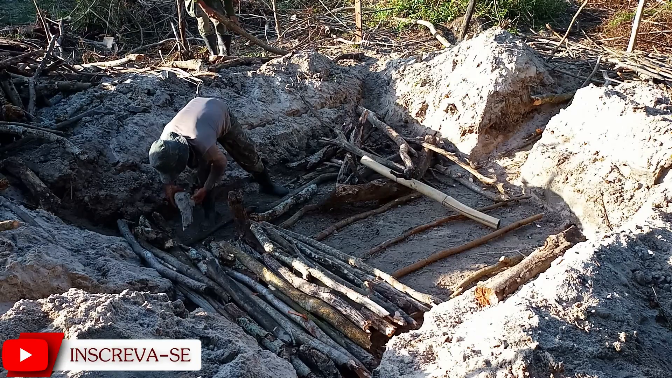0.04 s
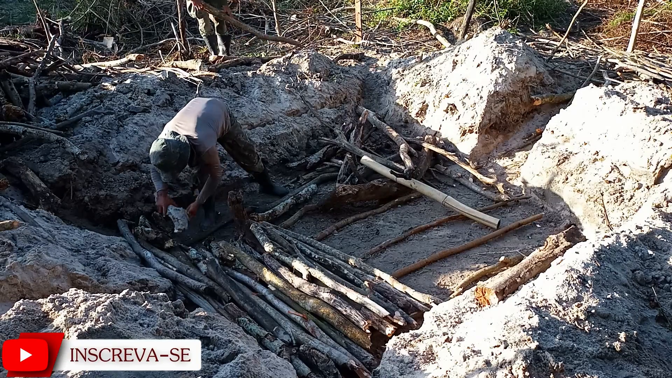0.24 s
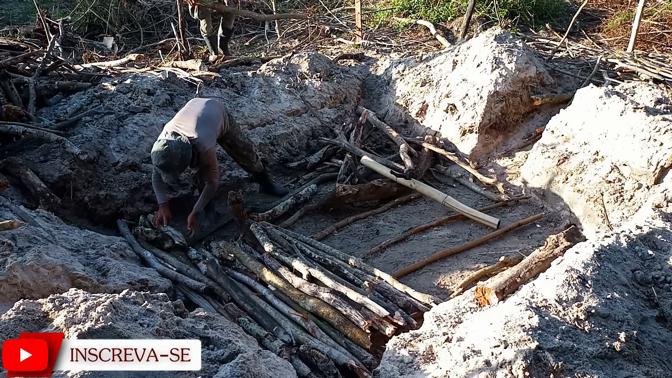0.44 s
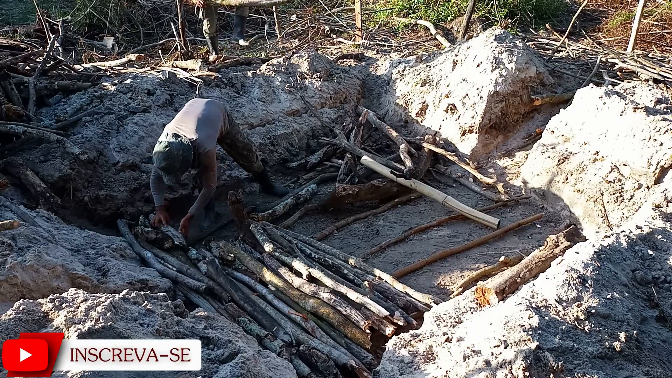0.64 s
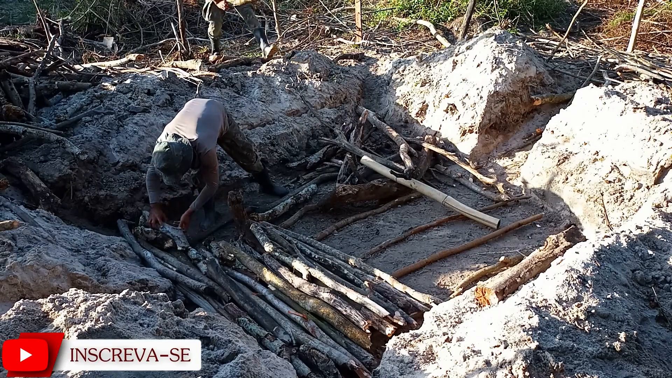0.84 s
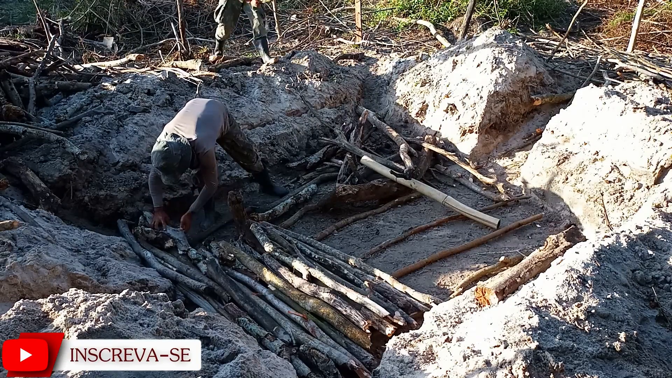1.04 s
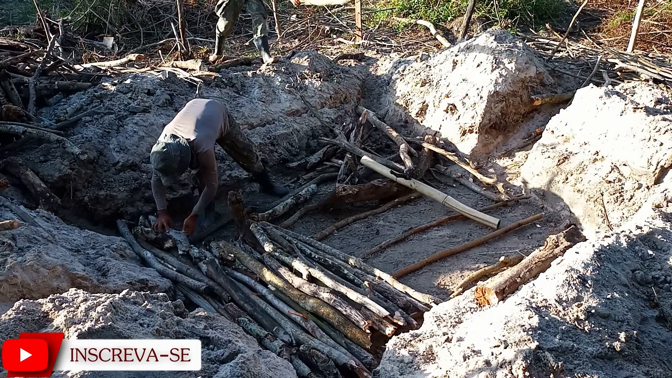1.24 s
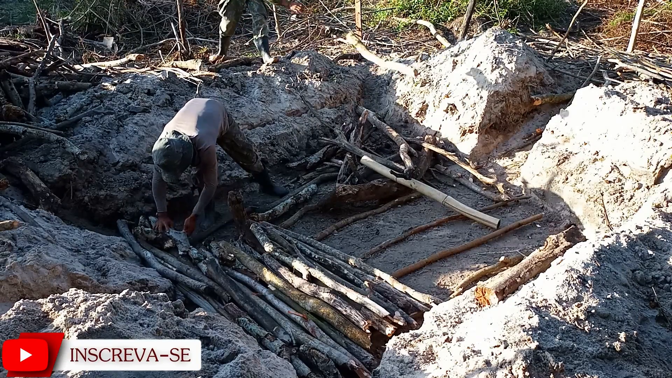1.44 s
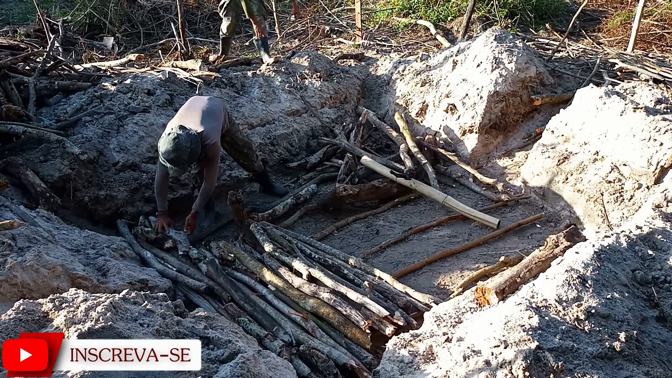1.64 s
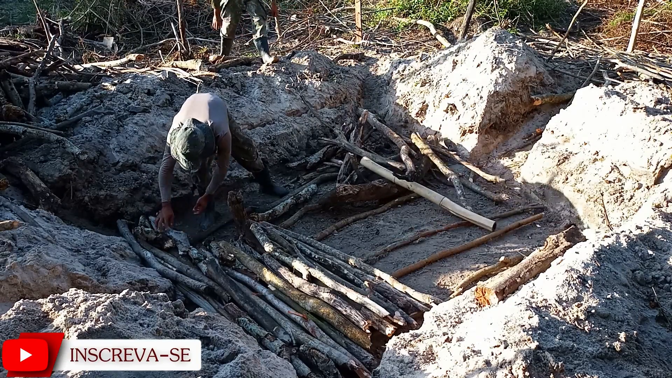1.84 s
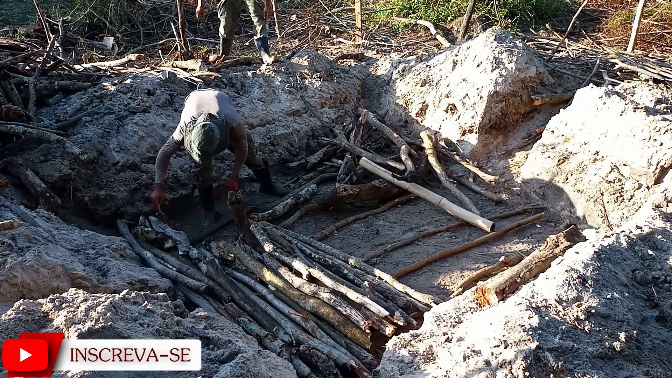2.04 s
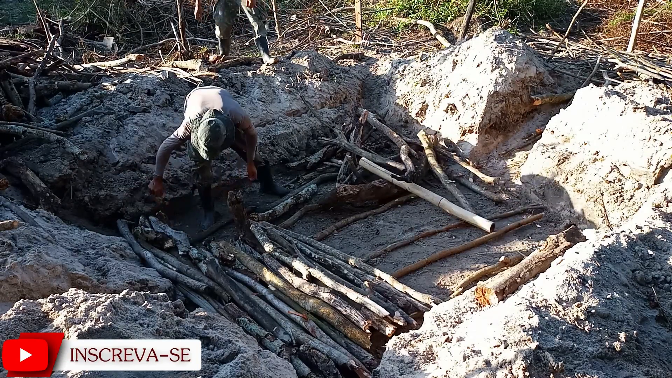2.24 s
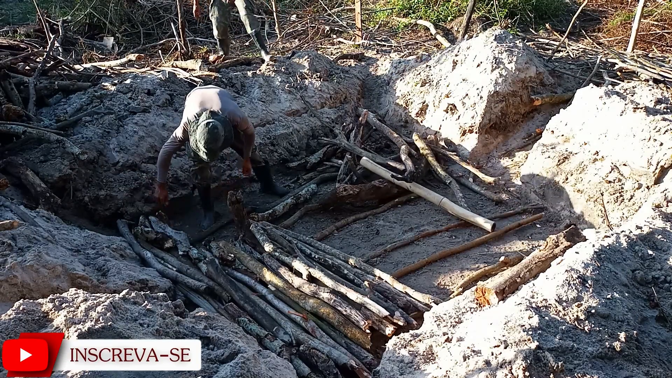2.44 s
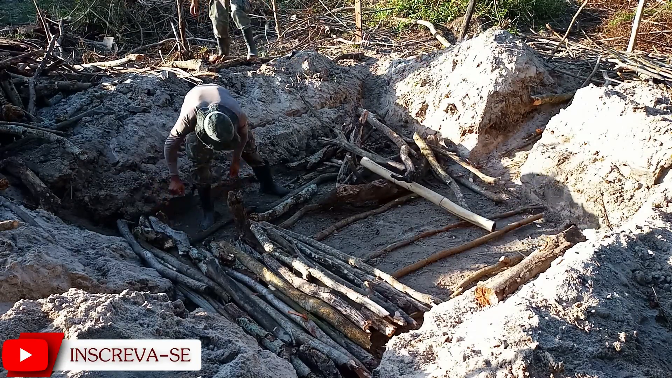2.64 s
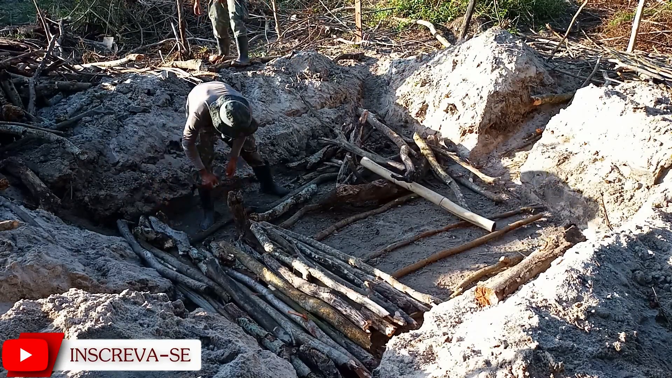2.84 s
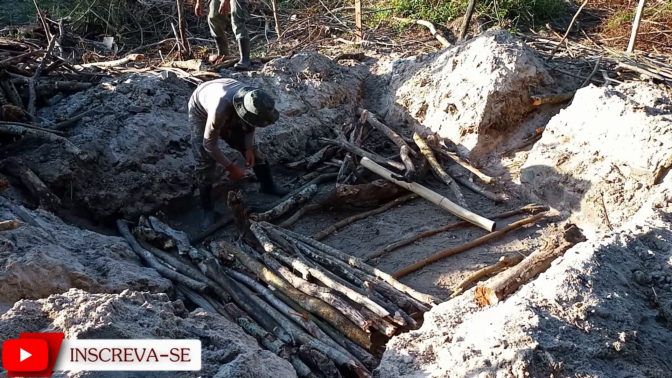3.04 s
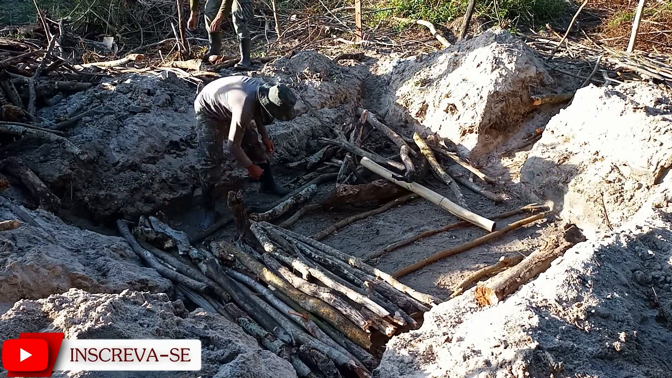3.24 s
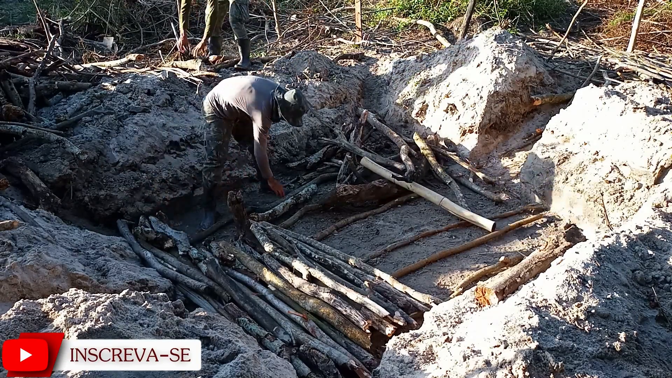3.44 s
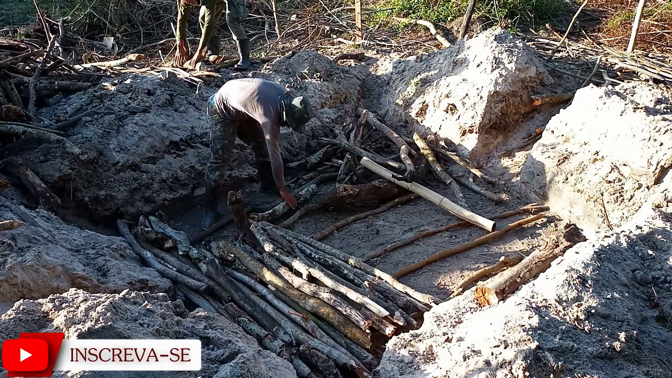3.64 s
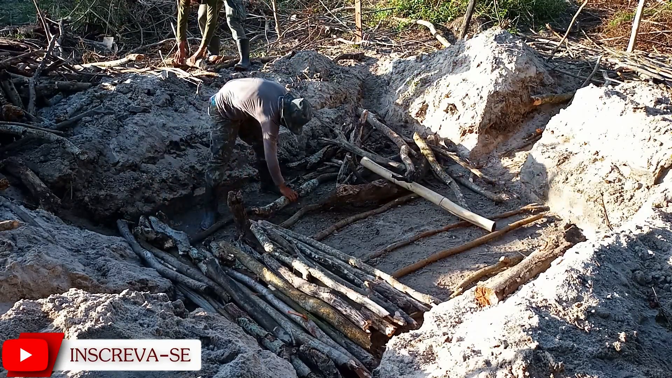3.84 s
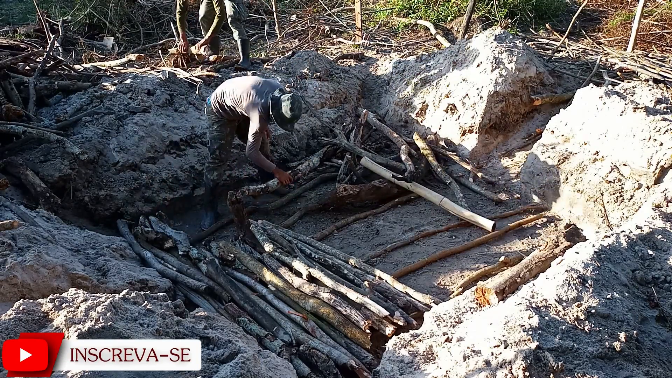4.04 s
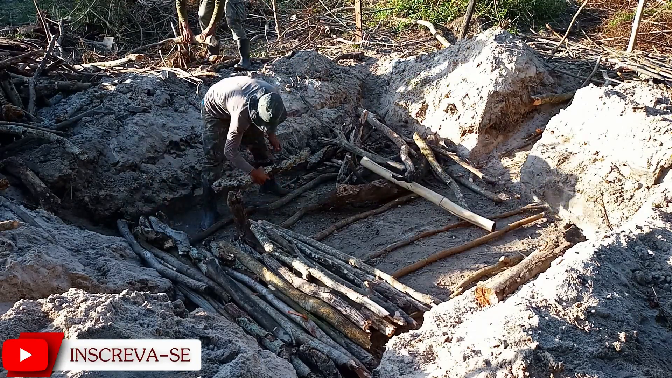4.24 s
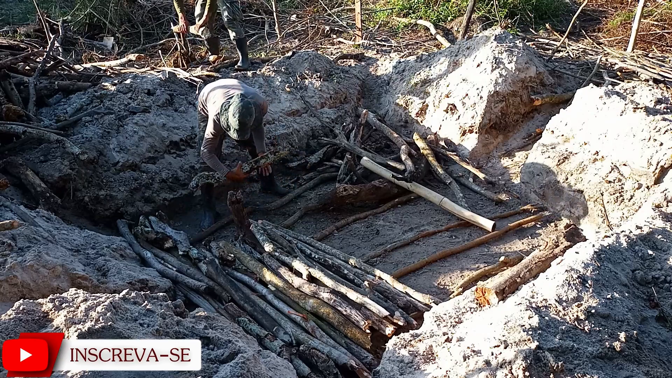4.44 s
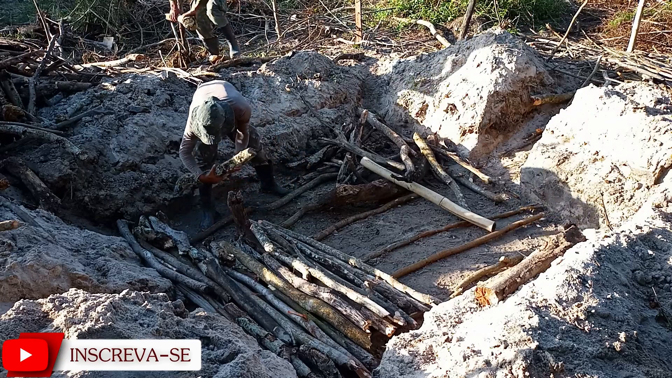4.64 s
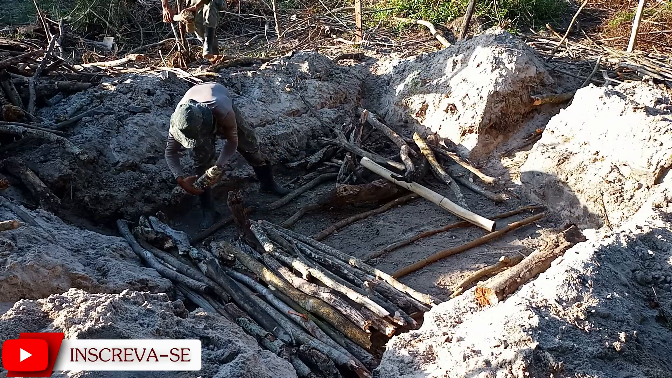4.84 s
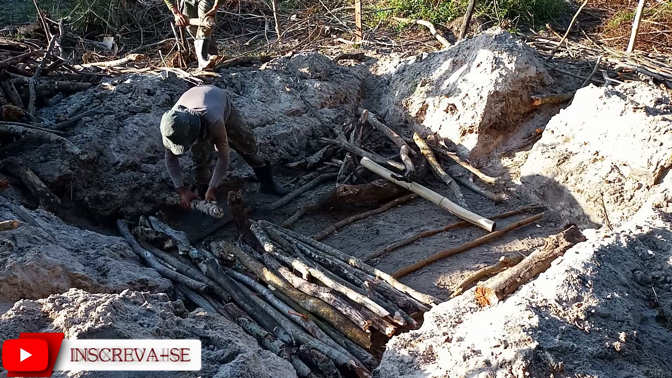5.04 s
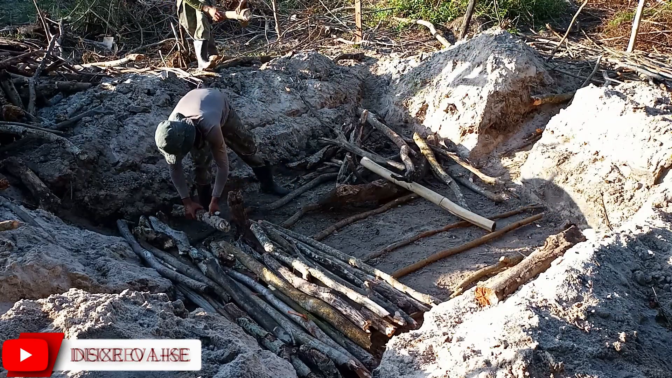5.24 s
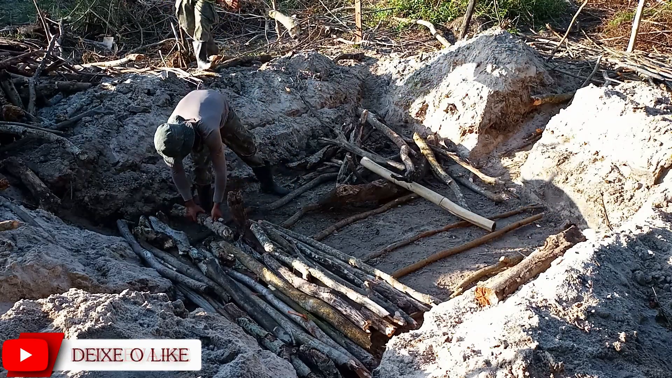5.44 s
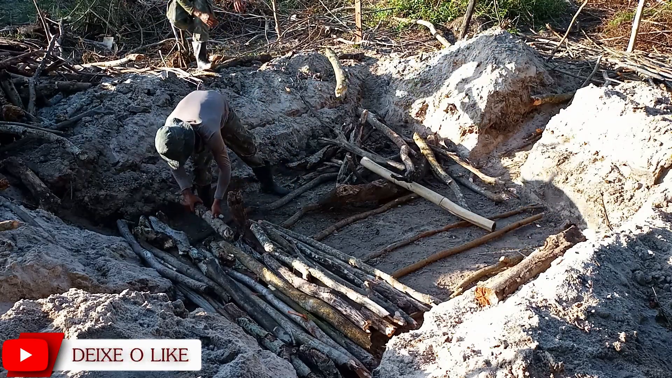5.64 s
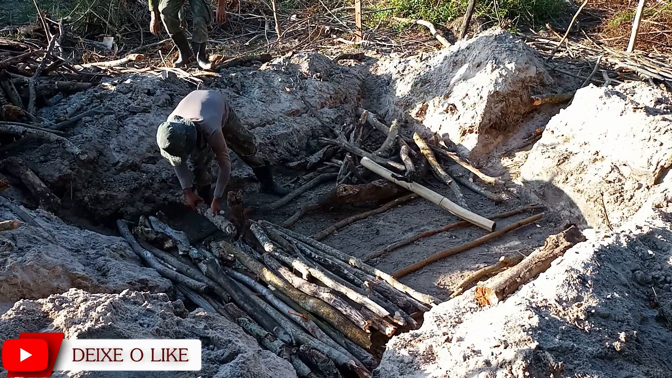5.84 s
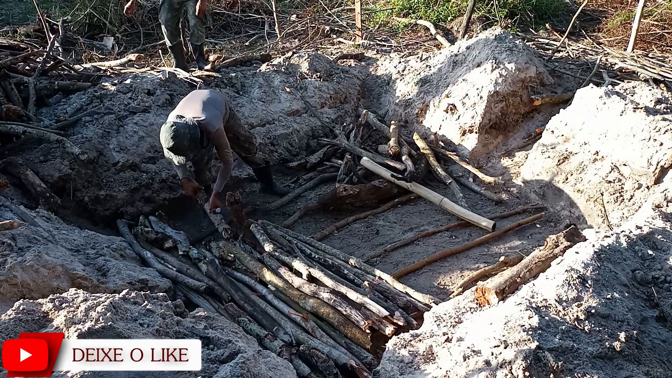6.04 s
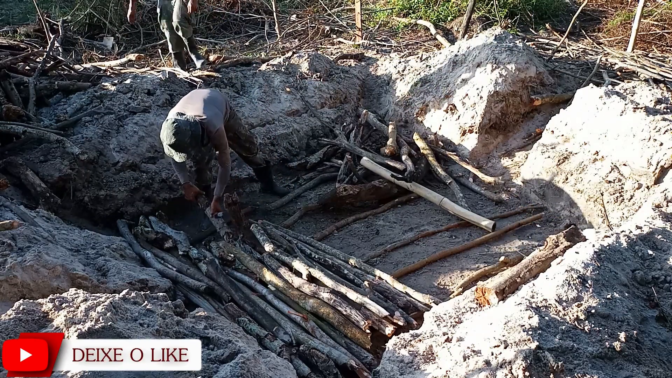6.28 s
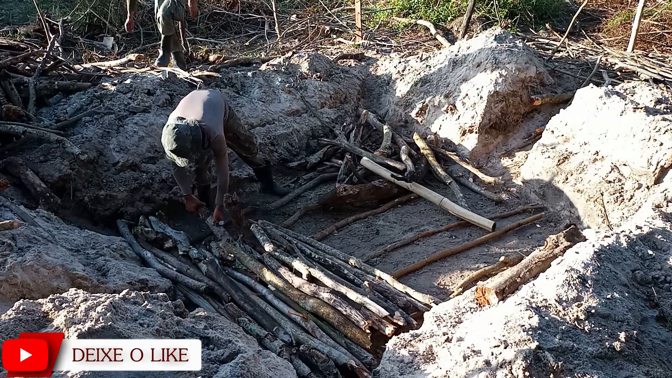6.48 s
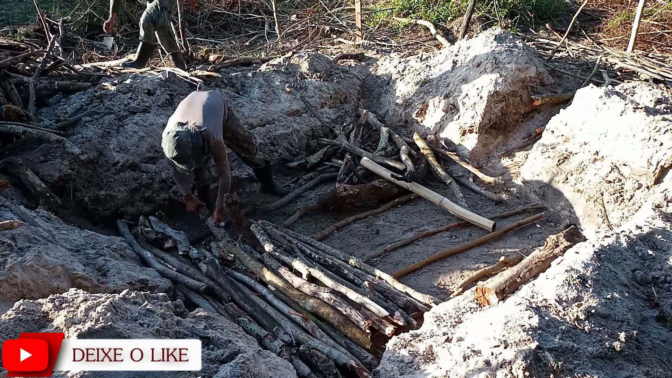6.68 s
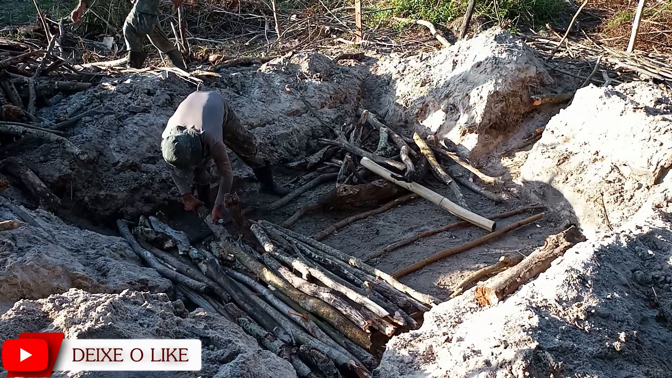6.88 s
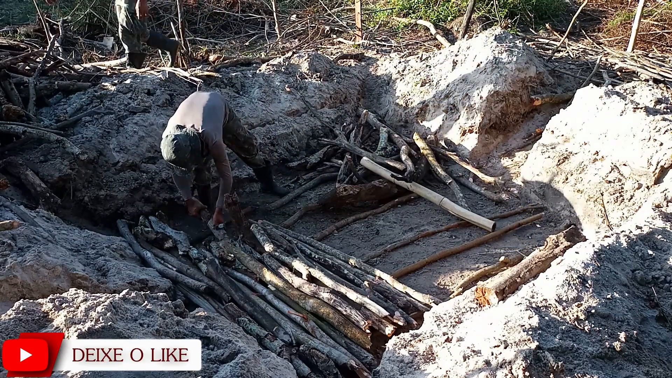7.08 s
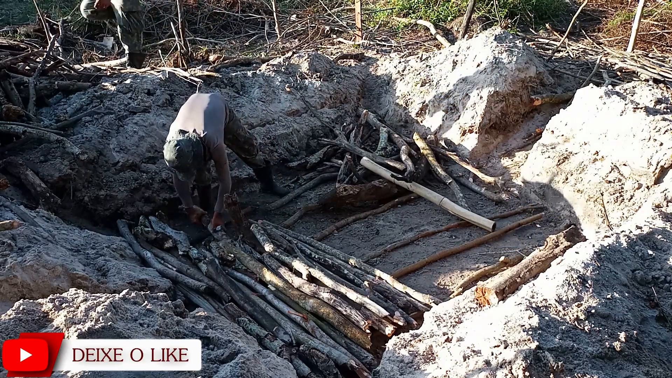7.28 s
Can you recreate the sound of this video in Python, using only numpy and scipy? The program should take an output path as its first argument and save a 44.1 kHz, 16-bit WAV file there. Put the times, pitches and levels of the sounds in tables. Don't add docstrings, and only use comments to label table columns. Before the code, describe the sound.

Dry firewood is stacked by hand. A short knock and light ticks lead to a loud double-ended log landing just before two seconds, woody and ringing. Mostly bark scuffs, leaf crackle and short thin bird whistles fill the middle, with one crisp tick. Near six seconds a shorter log cracks and thuds, bouncing briefly, then splintery clicks trail off. Soft wind, far insects, mono microphone at a few metres.

```python
import sys
import numpy as np
from scipy import signal
from scipy.fft import rfft, irfft, next_fast_len
from scipy.io import wavfile
from scipy.ndimage import uniform_filter1d

SR = 44100
rng = np.random.default_rng(int(sys.argv[2]) if len(sys.argv) > 2 else 0)


def to_linear_factor(level_db):
    exponent = np.asarray(level_db, float) / 20
    return 10 ** exponent


def store_pcm(level_fs):
    pcm = np.round(np.clip(level_fs, -1, 1) * 32767).astype(np.int16)
    wavfile.write(sys.argv[1], SR, np.atleast_2d(pcm).T)


N = 322371

# ratio to its strong mode, level/dB
LOG_MODES = [(0.682, -9.5), (0.998, 0), (1.398, -8), (1.95, -9), (2.6, -16)]
# t/s, peak level/dB, strong mode f/Hz, thump under 300 Hz level/dB
LOG_BLOWS = [(0.493, -30.5, 798, -12), (0.497, -29, 1035, -13.5), (0.983, -42.5, 793, -35),
             (1.004, -38, 668, -11), (1.198, -43, 1290, -27), (1.343, -37, 569, -25),
             (1.361, -38.5, 900, -6.5), (1.508, -50.5, 562, -27), (1.75, -24.5, 798, -23),
             (1.7802, -17, 683, -20), (1.7836, -18, 585, -20), (1.804, -23.5, 370, -30),
             (1.8232, -18, 593, -12), (1.8371, -24.5, 696, -20), (1.864, -33, 374, 0),
             (1.889, -32, 345, -24), (1.931, -43.5, 450, 7.5), (2.045, -44, 603, -3), (2.1, -37, 727, -34),
             (5.952, -21, 992, -6), (5.973, -20.5, 603, -27), (5.947, -27, 794, -20),
             (6.009, -27.5, 622, -33), (6.0135, -26.5, 455, -28), (6.036, -42, 554, -15),
             (6.086, -44, 540, -9), (6.256, -46, 637, -23), (6.664, -44.5, 808, -12),
             (7.082, -45, 580, -6.5)]
# t/s, peak level/dB, strong mode f/Hz, t60/s
DULL_BLOWS = [
    (0.5003, -24.5, 738, 0.032),
    (1.358, -23.5, 850, 0.01),
    (2.034, -29.5, 1234, 0.037),
    (3.787, -39, 1560, 0.018),
    (5.462, -46.5, 490, 0.064),
    (6.002, -17, 484, 0.053),
    (6.706, -52, 240, 0.28),
]
# f/Hz, t60/s, first end level/dB, second end level/dB
LONG_LOG_MODES = [(240.4, 0.13, -13, -7), (299, .12, -8.5, -6), (392, 0.055, -3, -22),
                  (455, 0.077, -13, -2.5), (576, .09, -7, 4), (622, 0.086, -2, -14), (692, 0.055, 3, -0.5),
                  (915, 0.091, -5, -10), (1150, 0.039, -14, -22), (1380, 0.1, -12, -16)]
# t/s, level/dB
FIRST_END_BLOWS = [
    (1.78, -16.5),
    (1.7832, -20.5),
]
# t/s, level/dB
SECOND_END_BLOWS = [
    (1.8225, -19),
    (1.8255, -21.5),
    (1.8333, -25),
    (1.8373, -24),
]
# f/Hz, t60/s, level/dB
SHORT_LOG_MODES = [(314, 0.058, -14.5), (443, 0.057, -1), (573, 0.047, -0.5), (638, 0.053, -4.5),
                   (745, 0.025, -12), (900, .04, -15), (1050, .03, -18)]
# t/s, level/dB
SHORT_LOG_BLOWS = [
    (6.0016, -16.5),
    (6.0095, -26),
    (6.0146, -21),
    (6.037, -33),
    (6.057, -40),
]
# f/Hz, t60/s, level/dB
BUTT_LOG_MODES = [(398, .08, -3.5), (496, 0.088, 1.5), (585, 0.054, -2)]
# t/s, level/dB
BUTT_LOG_BLOWS = [
    (5.4615, -38),
]
# t/s, peak level/dB, ring f/Hz, treble above 4 kHz level/dB, t60/s
STICK_CRACKS = [(0.4895, -31, 2660, -29.5, 0.067), (0.4995, -18.5, 3880, -43, 0.023),
                (1.2002, -41.5, 1560, -56, 0.051), (1.3523, -28, 1520, -58, 0.034),
                (1.751, -15.5, 5200, -25, 0.014), (1.7517, -11, 2520, -24, 0.036),
                (1.7805, -17.5, 1540, -33, 0.038), (1.784, -16.5, 3680, -21, 0.056),
                (1.8048, -18.5, 4200, -39, 0.13), (1.8257, -17, 2800, -39, 0.073),
                (1.8394, -24.5, 1350, -22.5, 0.1), (1.8644, -24.5, 3400, -41, 0.018),
                (1.8826, -20, 2030, -40, 0.028), (1.8984, -28, 5200, -27, 0.024),
                (2.0353, -34.5, 2470, -54, 0.043), (2.0945, -24.5, 3000, -38, 0.046),
                (3.787, -20.5, 4340, -9, 0.0053), (5.9474, -22.5, 3240, -41, 0.089),
                (5.9554, -10.5, 3540, -47, 0.04), (5.9694, -17.5, 5000, -40, .026),
                (5.9754, -20.5, 1730, -20, 0.027), (5.9998, -21, 1570, -51, 0.041),
                (6.1414, -23, 3080, -37, 0.027), (6.2574, -34.5, 4150, -32, 0.052)]
# t/s, peak level/dB, treble above 4 kHz level/dB, t60/s
BARK_SCUFFS = [(0.3994, -62, -53, 0.13), (0.595, -46, -77, 0.066), (0.6478, -48, -60, 0.05),
               (0.656, -43.5, -42, 0.18), (0.9377, -44, -57, 0.017), (0.9524, -43.5, -63, 0.084),
               (0.9838, -45.5, -50, 0.078), (1.0035, -38, -62, 0.073), (1.169, -47.5, -70, 0.13),
               (1.3239, -38.5, -60, 0.13), (1.933, -29, -54, 0.089), (2.3003, -40.5, -55, 0.032),
               (2.5396, -47, -40, .02), (3.34, -53, -47.5, 0.17), (3.4516, -53.5, -71, 0.13),
               (3.484, -60, -47, .042), (3.7884, -37, -28.5, 0.12), (4.6244, -58, -51, 0.076),
               (4.7, -70, -51, 0.063), (5.0776, -49, -43, 0.17), (5.739, -47.5, -50, 0.072),
               (6.0861, -42, -56, 0.08), (6.3284, -47.5, -45, 0.081), (6.506, -56, -41, 0.08),
               (6.5308, -49, -39, 0.12), (6.54, -39.5, -38, 0.1), (6.64, -40.5, -66, 0.15),
               (6.9526, -46, -66, 0.12), (7.123, -38, -54, 0.063), (7.253, -41.5, -63, 0.13)]
# f/Hz, level/dB, t60/s
TWIG_MODES = [(1070, -7, 0.16), (1930, 0, 0.06), (2950, -5, 0.036), (3930, -27, 0.044), (4700, -7, 0.038),
              (6500, -4, 0.037)]
# t/s, level/dB
TWIG_TAPS = [
    (2.0941, -32),
    (2.098, -28.5),
    (2.111, -46),
]
# t/s, peak level/dB, ring f/Hz, t60/s
RING_TICKS = [(0.609, -50, 3300, .015), (0.985, -44, 1500, .02), (1.753, -17.5, 5670, 0.01),
              (3.7872, -24.5, 8530, 0.012), (0.9372, -47, 4370, .015), (0.9375, -48, 3050, .015),
              (0.953, -46, 3800, .018), (1.187, -46, 5100, .012), (1.199, -35, 1320, 0.014),
              (1.201, -48, 2700, .012), (1.7842, -20, 5800, 0.009), (1.8085, -25, 3900, .015),
              (1.8265, -36, 2770, 0.011), (1.8385, -24, 4550, .012), (1.8655, -27, 4700, .012),
              (1.886, -32, 2300, 0.013), (2.539, -48, 3530, 0.013), (3.296, -60, 3600, .01),
              (5.9575, -28, 3850, .015), (5.976, -22, 2300, 0.012), (6.506, -49, 3000, .015),
              (7.082, -56, 1220, 0.014), (0.4992, -25.5, 1110, 0.032), (1.7526, -18.5, 1864, 0.034),
              (1.7804, -18, 1193, 0.045), (1.8245, -21.5, 920, 0.056), (1.8385, -25, 1333, 0.032),
              (2.0955, -33, 1955, 0.04), (2.3004, -45, 5070, .008), (2.3, -57, 10400, .008),
              (5.9551, -33, 2000, 0.027), (6.257, -44, 9000, .008), (6.2577, -42, 13000, .008),
              (6.551, -44, 2200, .012), (6.655, -46, 2740, .02), (6.69, -46, 900, 0.06),
              (1.009, -52, 4350, .015), (1.327, -45, 3160, .025), (6.7, -50, 1150, .06),
              (5.977, -23.5, 920, 0.037), (5.956, -20.5, 1034, 0.025), (6.087, -37.5, 2050, 0.016),
              (1.945, -40.5, 1200, 0.074), (6.142, -37.5, 1800, .02), (6.259, -44, 1130, 0.027),
              (1.888, -39, 420, .05), (1.807, -32, 330, 0.037)]
# t/s, peak level/dB, lower edge f/Hz
BARK_CLICKS = [(0.595, -50, 4000), (0.6074, -47, 4000), (0.9368, -51, 4000), (2.2997, -52, 4000),
               (2.5394, -44, 4000), (4.6224, -49, 4000), (4.7017, -52, 4000), (4.7805, -50, 4000),
               (4.9531, -54, 4000), (5.0789, -39.5, 4000), (5.2844, -57, 4000), (6.1409, -35.5, 4000),
               (6.2575, -36, 4000), (6.3275, -48, 4000), (6.507, -37, 4000), (6.5204, -42, 4000),
               (6.5311, -37, 4000), (6.5374, -46, 4000), (6.544, -39, 4000), (6.552, -30, 4000),
               (6.5894, -49, 4000), (6.6624, -48, 4000), (7.123, -50, 4000)]
# peak t/s, swell/s, level/dB, fineness/dB
SLIDES = [(0.05, 0.079, -76, -1), (0.494, 0.005, -68, -7), (0.62, 0.093, -64.5, 1),
          (0.999, 0.043, -58.5, -3), (1.15, 0.15, -68.5, 0.5), (1.36, 0.13, -70.5, -8),
          (1.92, 0.062, -46, -2), (2.12, 0.035, -59, -7), (2.28, 0.072, -65, -2), (2.48, 0.096, -67, -1.5),
          (3.3, 0.024, -69, 5), (3.39, 0.052, -67, 3), (3.5, 0.24, -78, 4), (3.773, 0.028, -59.5, -4),
          (3.85, 0.11, -71, 0), (4.15, 0.028, -78, -7), (4.55, 0.26, -71.5, -0.5), (4.8, 0.052, -72.5, 8),
          (4.88, 0.051, -71, -1), (5.05, 0.085, -66.5, 6), (5.25, 0.098, -69, -4), (5.6, 0.21, -70, -2.5),
          (6.0, 0.066, -58, -23), (6.14, 0.11, -60.5, 3.5), (6.38, 0.13, -63, -4), (6.62, 0.11, -62, 1.5),
          (7.0, 0.14, -66.5, 0), (7.2, 0.23, -68, -20)]
# peak t/s, swell/s, level/dB
LEAF_DRAGS = [
    (0.05, .08, -71),
    (4.82, .07, -68),
    (4.97, 0.086, -64.5),
    (5.2, .06, -67.5),
]
# t/s, length/s, start f/Hz, end f/Hz, level/dB
BIRD_GLIDES = [(0.836, 0.064, 3540, 2450, -65), (1.041, 0.058, 4010, 3600, -57),
               (1.1, 0.05, 3250, 2780, -65), (1.358, 0.061, 3900, 4095, -51.5),
               (1.403, .03, 3800, 3400, -60), (2.977, 0.06, 3080, 3300, -74),
               (1.465, 0.036, 3350, 2950, -62), (1.534, 0.051, 3250, 2660, -74),
               (1.656, 0.04, 3600, 3450, -54.5), (1.682, .045, 3250, 2750, -60),
               (2.474, 0.021, 3210, 2950, -57), (3.034, 0.048, 5850, 4750, -68),
               (3.094, 0.03, 5150, 4240, -61), (3.192, 0.024, 2800, 2680, -62),
               (3.958, .04, 3580, 3860, -65.5), (4.03, 0.094, 6060, 6480, -60),
               (4.544, 0.065, 3150, 3400, -64.5), (4.6, 0.19, 3400, 3270, -68.5),
               (4.865, 0.031, 2900, 3060, -60), (4.844, 0.031, 4160, 3650, -64),
               (5.184, 0.034, 3980, 3600, -66), (5.216, 0.055, 3140, 2780, -69),
               (5.887, .03, 3500, 4040, -54), (6.231, 0.067, 3650, 2660, -53),
               (6.418, 0.045, 3800, 3000, -65), (6.719, 0.031, 3560, 4000, -60),
               (6.749, 0.046, 4000, 2780, -58), (4.147, 0.026, 6400, 6180, -69)]
# t/s, length/s, f/Hz, level/dB
BIRD_PIPS = [(0.444, 0.05, 4000, -65), (0.513, .08, 3930, -68), (0.811, 0.051, 3430, -68),
             (1.019, .1, 3400, -61), (1.0, .09, 2770, -69), (1.415, 0.13, 4500, -68),
             (1.528, .05, 3980, -70), (1.602, 0.026, 3740, -66), (1.69, 0.065, 3570, -66),
             (2.612, 0.0094, 5800, -64), (2.707, .008, 2760, -70), (2.72, 0.0077, 2710, -60.5),
             (2.81, 0.0094, 2740, -63.5), (2.906, 0.011, 2690, -66), (3.064, 0.021, 4650, -64),
             (3.17, 0.024, 2447, -61), (3.647, 0.086, 3760, -62.5), (3.924, 0.026, 3740, -55.5),
             (4.01, 0.04, 4004, -59), (4.202, 0.3, 3090, -74), (4.364, 0.022, 3514, -59),
             (4.39, 0.16, 3540, -71), (5.087, .03, 3040, -69), (5.43, 0.12, 3710, -68.5),
             (5.582, 0.04, 3440, -64), (5.913, 0.041, 3960, -50.5), (6.452, 0.15, 2975, -62.5)]
# peak t/s, swell/s, level/dB
FLOCK_CALLS = [
    (1.08, 0.065, -63),
    (1.45, 0.051, -63),
    (1.58, .08, -67),
    (1.72, 0.043, -69),
    (4.9, 0.11, -69),
]
# t/s, level/dB
WIND_LEVEL = [(0.0, -59), (0.3, -60.5), (0.63, -57.5), (1.32, -64.5), (1.77, -58.5), (1.97, -60),
              (2.12, -66), (2.58, -63), (2.81, -67.5), (3.7, -61), (4.01, -62.5), (5.03, -57.5),
              (5.44, -63.5), (5.7, -58.5), (6.11, -55), (6.43, -58), (6.98, -59.5), (7.31, -56)]
# f/Hz, level/dB per Hz
WIND_SPECTRUM = [(35, -61), (60, -38), (134, -14.5), (280, -18.5), (410, -2), (504, -3.5), (601, -2.5),
                 (817, -13), (1080, -10), (1370, -30.5), (2000, -43), (2600, -71), (4400, -120)]
# peak t/s, swell/s, level/dB
SETTLING = [
    (1.88, 0.042, -44),
    (2.04, 0.054, -59.5),
    (6.1, 0.047, -56),
]
# peak t/s, swell/s, level/dB
RUMBLES = [
    (0.02, 0.092, -79),
    (2.0, 0.057, -69),
    (3.2, 0.23, -72),
    (3.8, 0.14, -74),
    (6.5, 0.04, -73),
]
# f/Hz, level/dB per Hz
AIR_SPECTRUM = [(400, -3), (600, -4), (1000, -14), (1600, -12.5), (2300, -25), (3600, -17.5), (4600, -19),
                (5800, -28.5), (7000, -26.5), (8500, -33.5), (10500, -31), (12000, -54), (15500, -36)]
# centre f/Hz, width/Hz, level/dB
INSECTS = [(6630, 340, -75), (7310, 540, -78)]


def unit(x):
    return x / np.sqrt(np.mean(x ** 2))


def clock(length):
    return np.arange(length) / SR


def sine(hz, t):
    return np.sin(2 * np.pi * hz * t)


def add(out, s, x):
    i = int(s * SR)
    out[i:i + len(x)] += x[:N - i]


def fade(t, t60, rise_s):
    return (1 - np.exp(-t / rise_s)) * np.exp(-np.log(1000) * t / np.clip(t60, 0.008, 0.4))


def band(x, lo_hz, hi_hz, order=2):
    edges = [lo_hz, min(hi_hz, 0.45 * SR)]
    return signal.sosfilt(signal.butter(order, edges, "band", fs=SR, output="sos"), x)


def coloured(spectrum):
    hz, db = np.transpose(spectrum)
    size = next_fast_len(N)
    log_f = np.log(np.arange(size // 2 + 1) * SR / size + 1)
    gain = to_linear_factor(np.interp(log_f, np.log(hz), db))
    return unit(irfft(rfft(rng.standard_normal(size)) * gain, size)[:N])


def walk(rate):
    hold = int(SR / rate)
    steps = np.repeat(rng.standard_normal(N // hold + 1), hold)[:N]
    return unit(uniform_filter1d(uniform_filter1d(steps, hold), hold))


def patchy(x, lo_hz, octaves, slow_db, quick_db, count=3):
    edges = lo_hz * 2 ** (np.arange(int(count * octaves) + 1) / count)
    slices = (to_linear_factor(slow_db * walk(5) + quick_db * walk(18)) * band(x, lo, hi) for lo, hi in zip(edges, edges[1:]))
    return unit(sum(slices))


def swells(rows, bed_db):
    t, out = clock(N), to_linear_factor(bed_db)
    for s, swell_s, db in rows:
        u = (t - s) / max(swell_s, 0.01)
        out = out + to_linear_factor(db) * np.exp(-np.where(u < 0, u, u / 1.6) ** 2)
    return out


def struck(modes, blows, rise_s):
    out, t = np.zeros(N), clock(SR // 3)
    chance = rng.standard_normal((len(blows), len(modes)))
    for (s, db), scatter in zip(blows, chance):
        ring = sum(to_linear_factor(db + mode_db + 2.1 * c) * sine(hz, t) * fade(t, t60, rise_s)
                   for (hz, t60, mode_db), c in zip(modes, scatter))
        add(out, s, -ring)
    return out


def thrown_logs():
    first_end = [(hz, t60, first_db) for hz, t60, first_db, _ in LONG_LOG_MODES]
    second_end = [(hz, t60, second_db) for hz, t60, _, second_db in LONG_LOG_MODES]
    rings = struck(first_end, FIRST_END_BLOWS, 0.0005) + struck(second_end, SECOND_END_BLOWS, 0.0011)
    rings = rings + struck(SHORT_LOG_MODES, SHORT_LOG_BLOWS, 0.0009)
    rings = rings + struck(BUTT_LOG_MODES, BUTT_LOG_BLOWS, 0.002)
    return band(rings, 190, 16000)


def all_blows():
    blows = []
    for s, db, hz, thump_db in LOG_BLOWS:
        t60 = 0.077 * (600 / hz) ** 0.31
        rattle_db = -8.5 - 0.06 * (db + 13)
        blows.append((s, db, hz, thump_db, t60, rattle_db))
    return blows + [(s, db, hz, -32, t60, -12.5) for s, db, hz, t60 in DULL_BLOWS]


def thuds():
    out, t = np.zeros(N), clock(SR // 3)
    ratio, mode_db = np.transpose(LOG_MODES)
    overtone = mode_db < mode_db.max()
    pile = sine(238, t) + 1.73 * sine(295, t)
    for s, db, hz, thump_db, t60, rattle_db in all_blows():
        detune, scatter = rng.standard_normal((2, len(ratio)))
        mode_hz = hz * ratio * (1 + 0.071 * detune * overtone)
        ring = sum(to_linear_factor(d) * sine(m, t) * fade(t, t60 * (hz / m) ** 1.45, 0.00094)
                   for m, d in zip(mode_hz, mode_db + 2.4 * scatter))
        ring = ring / np.abs(ring).max()
        rattle = unit(band(rng.standard_normal(len(t)), 0.76 * hz, 2.01 * hz)) * fade(t, 1.65 * t60, 0.0013)
        thump = pile * fade(t, 1.35 * t60, 0.0065)
        add(out, s, to_linear_factor(db) * (-ring + to_linear_factor(rattle_db) * rattle + to_linear_factor(thump_db - 5) * thump))
    return band(out, 155, 16000)


def cracks():
    out, t = np.zeros(N), clock(SR // 5)
    scuffs = [(s, db, 3900, top_db, t60) for s, db, top_db, t60 in BARK_SCUFFS]
    for s, db, hz, top_db, t60 in STICK_CRACKS + scuffs:
        noise, chatter = rng.standard_normal((2, len(t)))
        noise = noise * to_linear_factor(2 * unit(uniform_filter1d(chatter, size=50)))
        shape = fade(t, t60, 0.1 * t60 ** 2)
        tail = to_linear_factor(-11.5) * fade(t, 3.17 * t60, 0.015)
        burst = unit(band(noise, 0.5 * hz, 5200))
        ring = unit(band(noise, 0.95 * hz, 1.05 * hz, order=1))
        overtone_hz = np.clip(hz * np.exp(0.33 * rng.standard_normal(4)), 900, 7000)
        overtones = unit(sum(band(noise, 0.96 * m, 1.04 * m, order=1) for m in overtone_hz))
        treble = unit(band(noise, 4120, 7250)) + to_linear_factor(4) * unit(band(noise, 8600, 0.43 * SR))
        modes = (shape + 0.67 * tail) * (0.54 * ring + 0.86 * overtones)
        body = (0.42 * shape + 0.85 * tail) * burst + modes
        add(out, s, to_linear_factor(db - 11) * body + to_linear_factor(top_db - 16.5) * (shape + tail) * treble)
    return out


def twig():
    out, t = np.zeros(N), clock(SR // 5)
    for s, db in TWIG_TAPS:
        for hz, mode_db, t60 in TWIG_MODES:
            level = to_linear_factor(db + mode_db + 2.9 * rng.standard_normal())
            add(out, s, level * sine(hz, t) * fade(t, min(0.62 * t60, 0.07), 0.00037))
    return out


def ticks():
    out, t = np.zeros(N), clock(SR // 20)
    for s, db, hz, t60 in RING_TICKS:
        level_chance, pitch_chance = rng.standard_normal(2)
        overtone = to_linear_factor(-10.5 + 2 * level_chance) * sine(hz * (1.5 + 0.178 * pitch_chance), t)
        add(out, s, to_linear_factor(db) * (sine(hz, t) + overtone) * fade(t, t60, 0.0002))
    return out


def clicks():
    out, t = np.zeros(N), clock(SR // 40)
    for s, db, lo_hz in BARK_CLICKS:
        burst = unit(band(rng.standard_normal(len(t)), lo_hz, 17600))
        add(out, s, to_linear_factor(db - 3) * burst * fade(t, 0.0097, 0.00032))
    return out


def grains(rate, spread_db):
    hits = (rng.random(N) < rate / SR) * to_linear_factor(spread_db * rng.exponential(size=N))
    smear = signal.lfilter([1], [1, -np.exp(-1 / (0.003 * SR))], hits)
    return (unit(smear) + 1.3) * rng.standard_normal(N)


def rustle():
    s, swell_s, db, fine_db = np.transpose(SLIDES)
    shower = grains(400, 2.6)
    crackle = patchy(band(shower, 3000, 5600, order=1), 2700, 4 / 3, 1.2, 1.8, count=6)
    scrape = patchy(shower, 900, 4 / 3, 2, 2)
    dust = to_linear_factor(2.6 * walk(25)) * unit(band(shower, 4000, 21000))
    bed_db = -83.5
    return (swells(zip(s, swell_s, db), bed_db) * crackle
            + swells(zip(s, swell_s, db - 10.5 - 0.78 * fine_db), bed_db - 16) * scrape
            + swells(zip(s, swell_s, db - 8 + fine_db), bed_db - 8.5) * dust)


def leaves():
    return swells(LEAF_DRAGS, -98) * unit(band(grains(900, 2.2), 3500, 7700))


def birds():
    out, wobble = np.zeros(N), walk(200)
    pips = [(s, length, hz, hz, db) for s, length, hz, db in BIRD_PIPS]
    for s, length, start_hz, end_hz, db in BIRD_GLIDES + pips:
        midway = 0.38 if end_hz < start_hz else 0.67
        mid_hz = start_hz + midway * (end_hz - start_hz)
        u = np.linspace(0, 1, int(length * SR))
        hz = start_hz * (1 - u) * (1 - 2 * u) + 4 * mid_hz * u * (1 - u) + end_hz * u * (2 * u - 1)
        waver_rad = 0.75 * wobble[int(s * SR):][:len(u)]
        shape = np.sin(np.pi * u ** 0.49) ** 0.15
        add(out, s, to_linear_factor(db) * shape * np.sin(2 * np.pi * np.cumsum(hz) / SR + waver_rad))
    out = out * to_linear_factor(2.5 * wobble[::-1])
    t = clock(SR // 2)
    trees = rng.standard_normal(len(t)) * fade(t, 0.3, 0.008)
    echoes = signal.fftconvolve(out, trees / np.linalg.norm(trees))[:N]
    return 0.8 * out + 0.8 * echoes * (1 + 0.5 * np.roll(wobble, SR))


def flock():
    lo_hz, hi_hz = 3400, 4200
    return swells(FLOCK_CALLS, -95) * patchy(rng.standard_normal(N), lo_hz, np.log2(hi_hz / lo_hz), 1.8, 4.2, count=14)


def wind():
    s, db = np.transpose(WIND_LEVEL)
    level = to_linear_factor(np.interp(clock(N), s, db) + 1.5) + swells(SETTLING, -83)
    gusts = patchy(coloured(WIND_SPECTRUM), 219, 8 / 3, 1, 2.57, count=5)
    rumble = patchy(rng.standard_normal(N), 118.5, 4 / 3, 2.8, 3.3)
    deep = to_linear_factor(-11 + 2 * walk(4.8)) * unit(band(rng.standard_normal(N), 25, 83))
    return level * gusts + swells(RUMBLES, -79) * (rumble + deep)


def clearing():
    noise = rng.standard_normal(N)
    chorus = sum(to_linear_factor(db + walk(4.15)) * unit(band(noise, hz - width / 2, hz + width / 2))
                 for hz, width, db in INSECTS)
    return to_linear_factor(-63.5) * patchy(coloured(AIR_SPECTRUM), 500, 5, 1.1, 2.3, count=8) + chorus


def hiss():
    return to_linear_factor(-88.5) * patchy(rng.standard_normal(N), 8500, 2 / 3, 1.5, 1.4, count=9)


def scene():
    wood = thrown_logs() + thuds() + cracks() + twig() + ticks() + clicks()
    debris = rustle() + leaves()
    background = birds() + flock() + wind() + clearing() + hiss()
    return (wood + debris + background)[None]


def roll_off(x):
    return signal.sosfilt(signal.butter(12, 16650, fs=SR, output="sos"), x)


def record(dry):
    low_cut = signal.butter(2, 80, "high", fs=SR, output="sos")
    top_cut = signal.ellip(8, 0.3, 40, 15650, fs=SR, output="sos")
    mix = signal.sosfilt(top_cut, signal.sosfilt(low_cut, dry))
    return roll_off(mix)


dry = scene()
out = record(dry)
store_pcm(out)
```